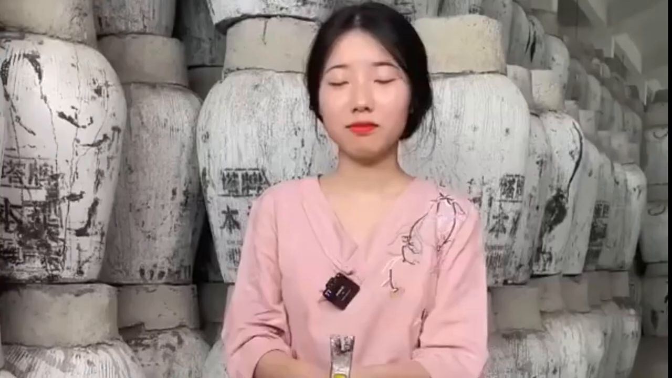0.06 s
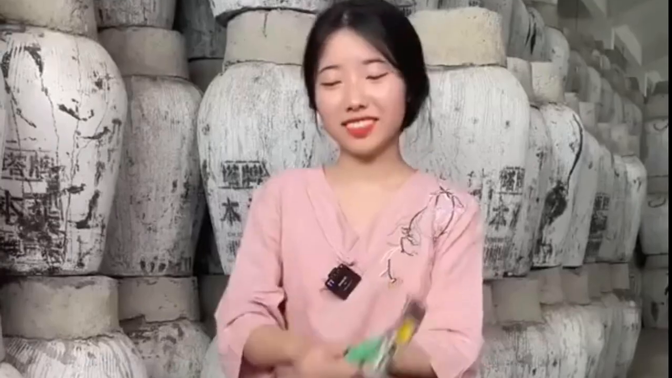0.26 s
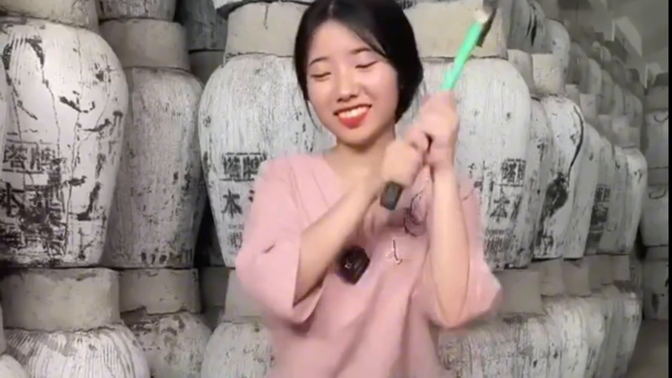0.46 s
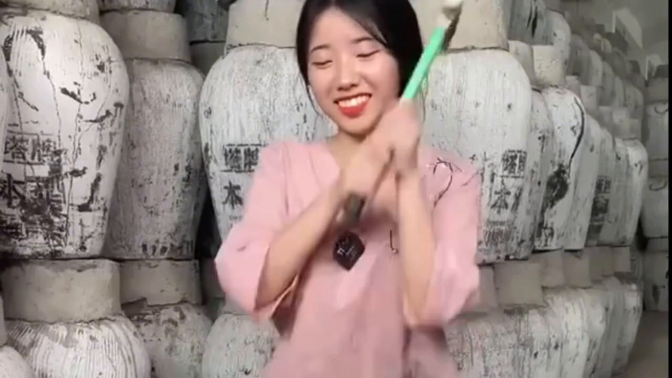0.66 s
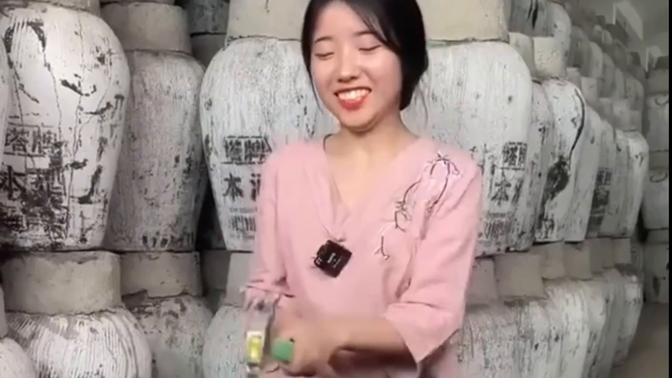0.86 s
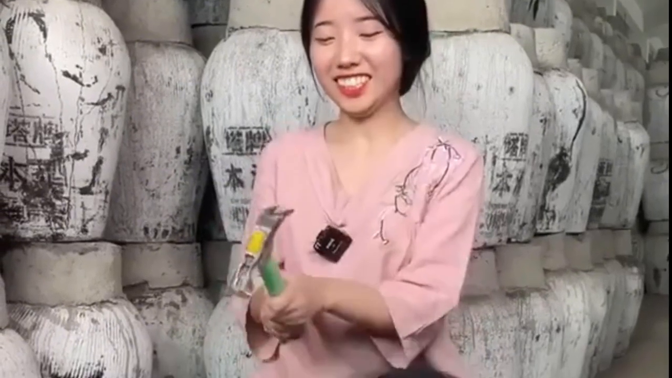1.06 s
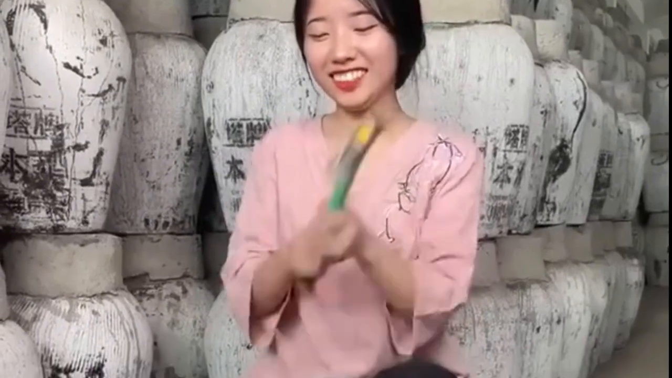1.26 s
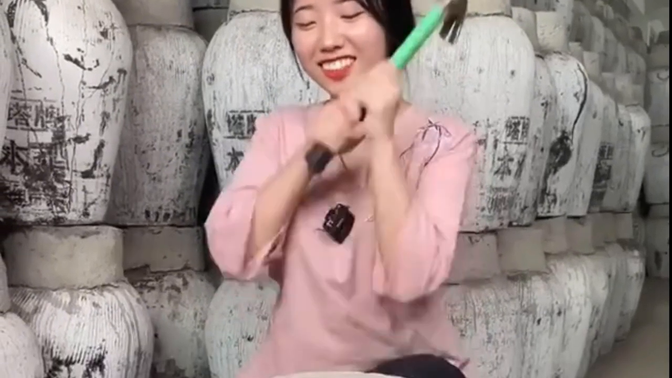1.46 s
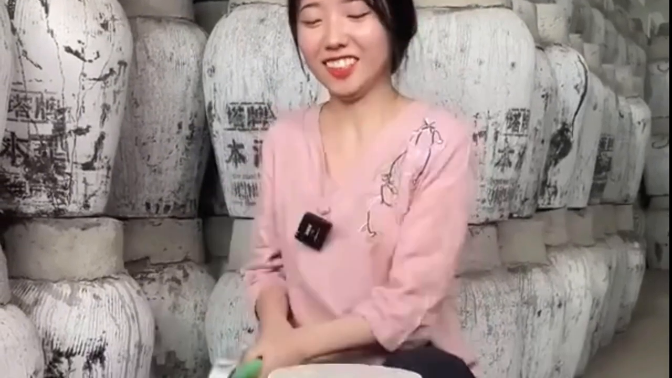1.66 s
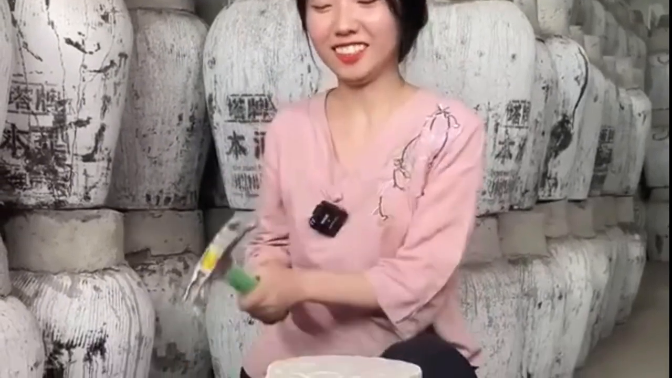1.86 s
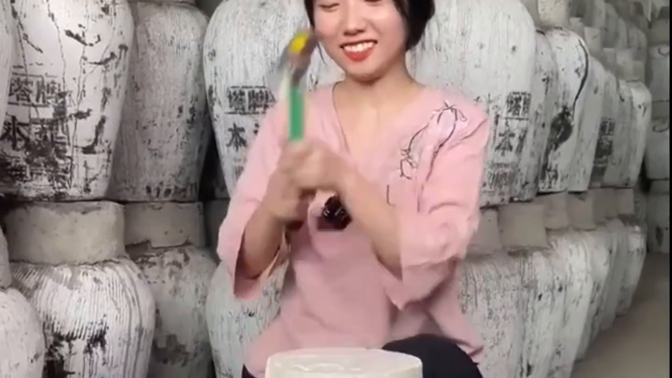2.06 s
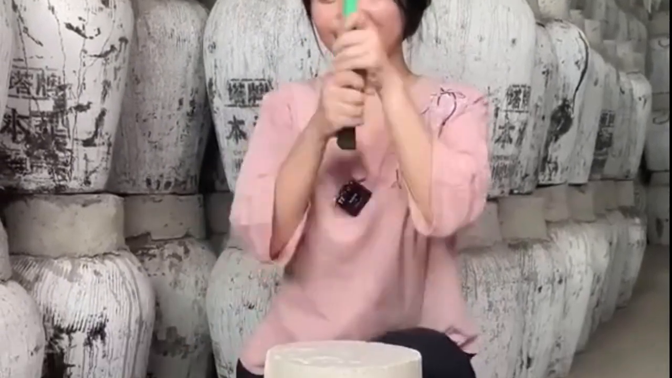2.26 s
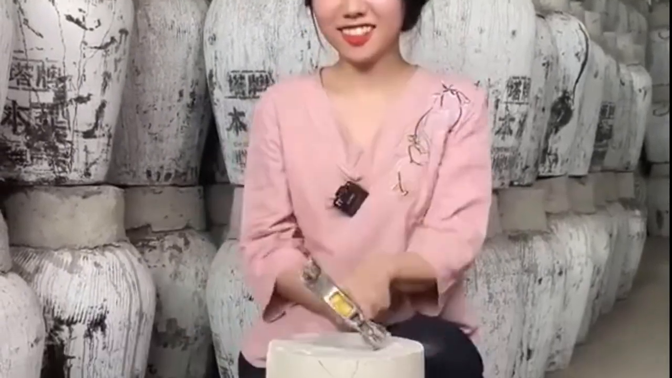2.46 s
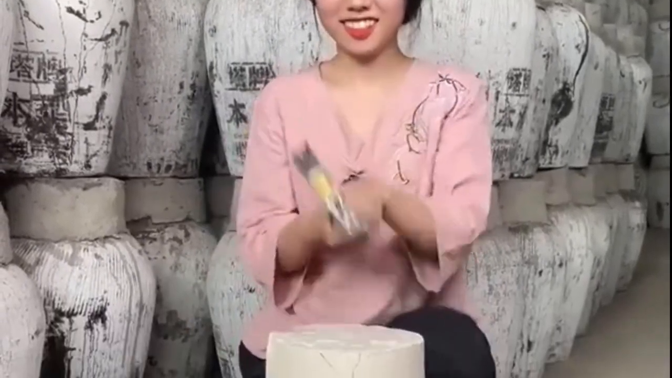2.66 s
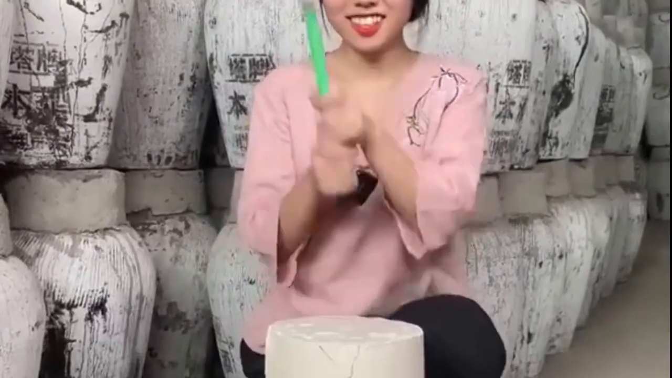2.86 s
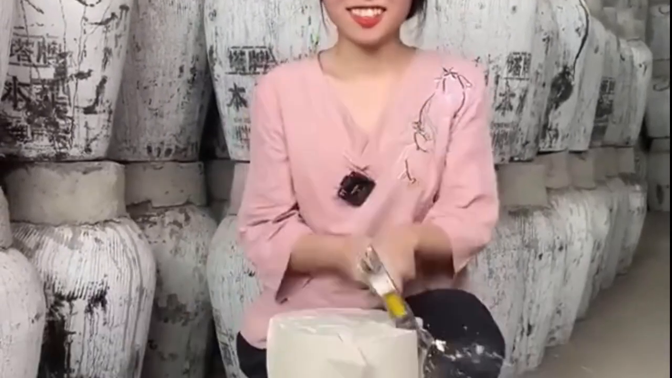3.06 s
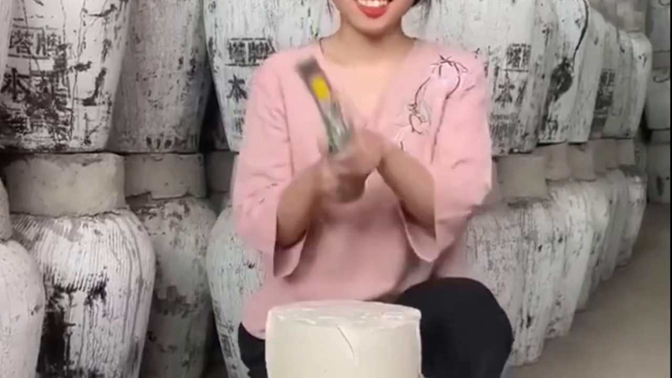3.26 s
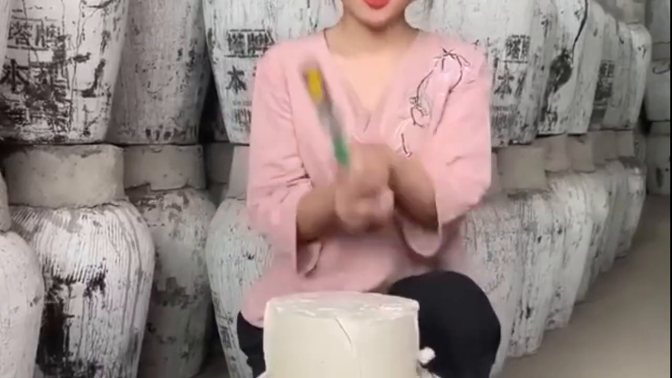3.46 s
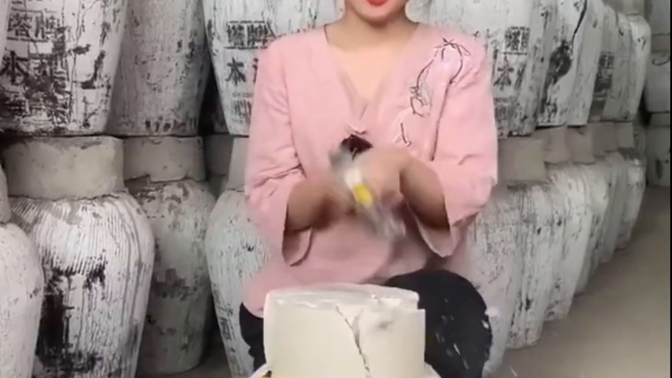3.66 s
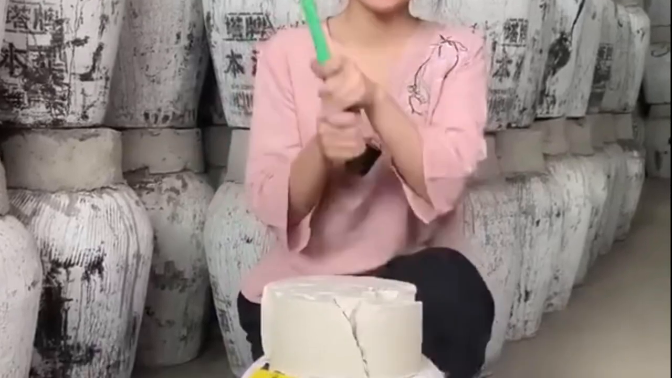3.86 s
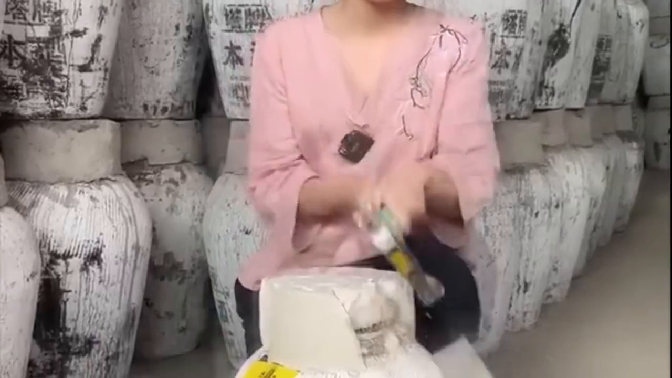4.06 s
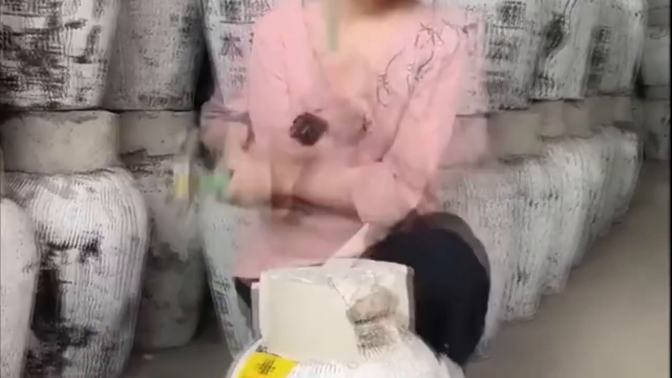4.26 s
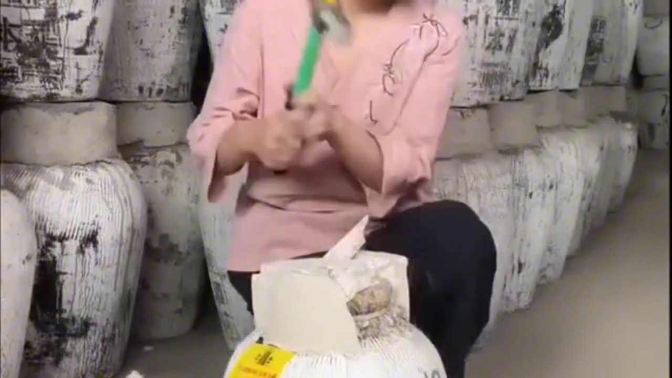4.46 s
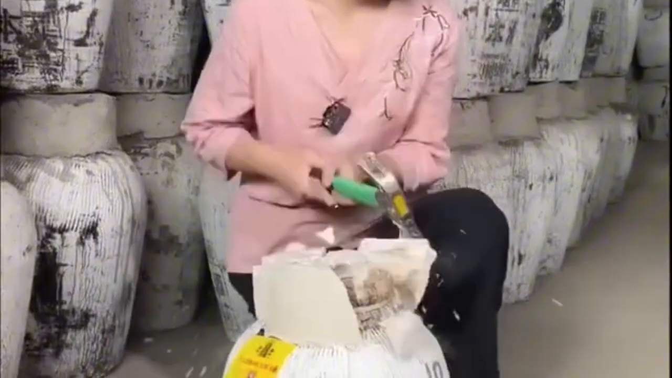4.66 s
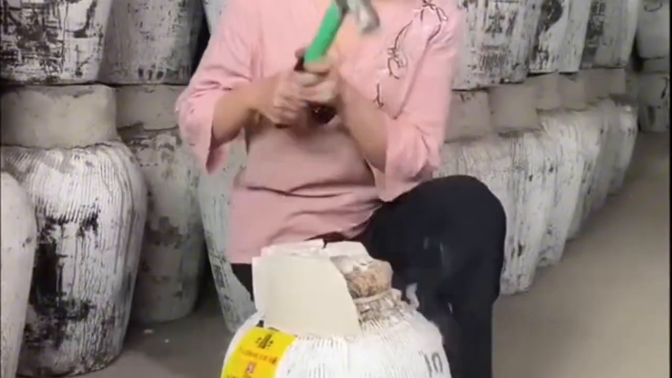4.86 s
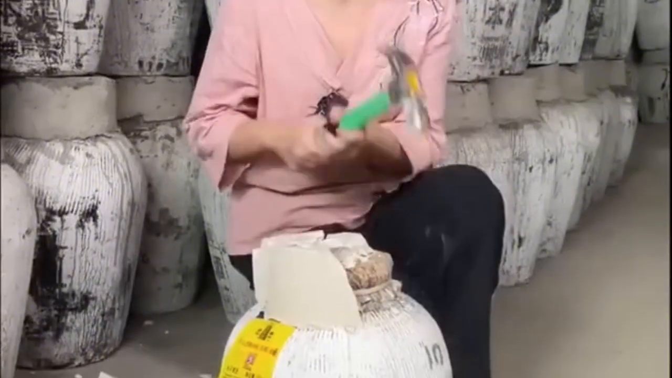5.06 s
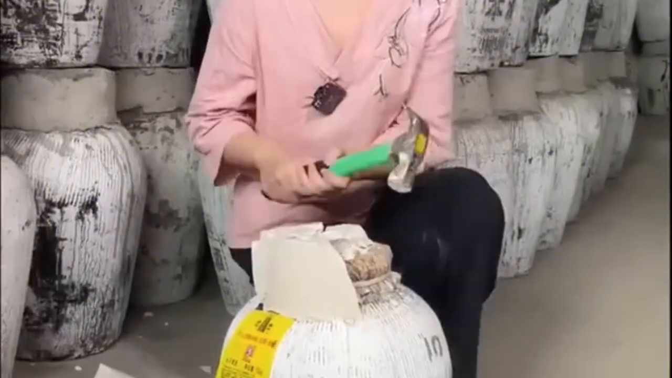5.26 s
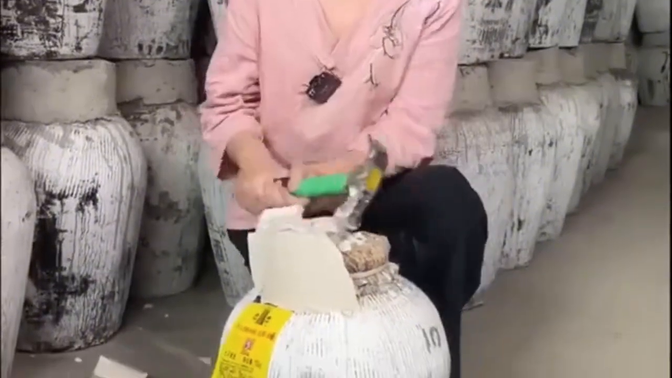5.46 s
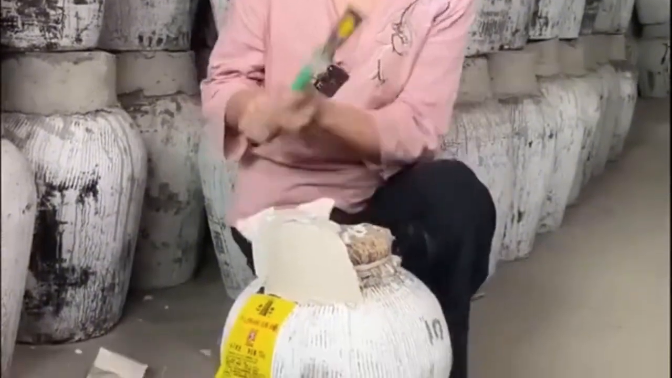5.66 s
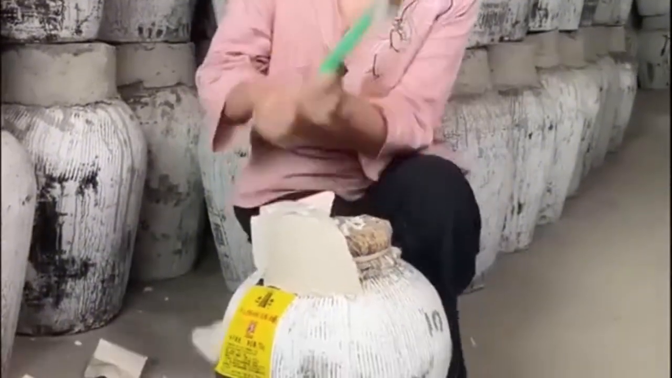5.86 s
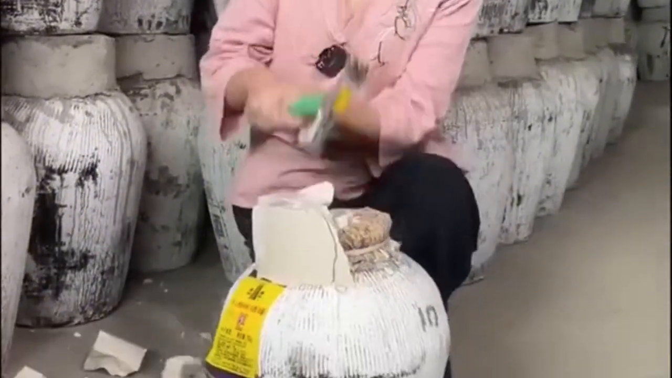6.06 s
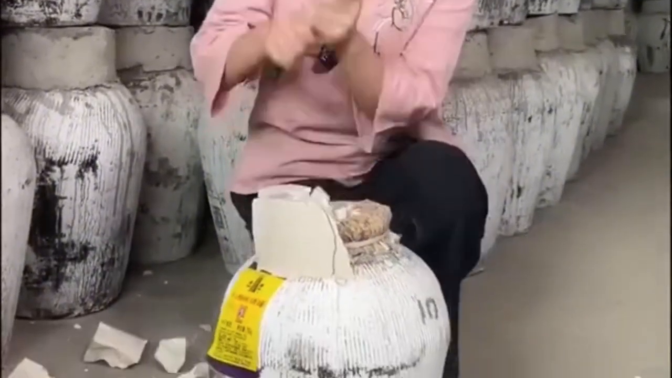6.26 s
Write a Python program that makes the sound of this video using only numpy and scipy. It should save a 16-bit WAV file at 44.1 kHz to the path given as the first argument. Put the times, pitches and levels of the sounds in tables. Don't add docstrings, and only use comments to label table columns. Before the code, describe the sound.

Sharp, slightly distorted hammer knocks, roughly every half to one second, split a clay seal. The jar answers with a short hollow ring around mid pitch and the stacked jars prolong it in a reverberant tail. Early blows are cleaner; from the middle onward, broken pieces tumble, thump, tick and scatter grit on the hard floor. Close phone microphone, quiet background hum.

```python
import sys
import numpy as np
from scipy import signal
from scipy.io import wavfile
from scipy.ndimage import uniform_filter1d

SR = 44100
rng = np.random.default_rng(int(sys.argv[2]) if len(sys.argv) > 2 else 0)


def waveform_to_disk(signal):
    frames = np.transpose(np.atleast_2d(signal))
    scaled = np.clip(frames, -1, 1) * 32767
    samples = np.round(scaled).astype(np.int16)
    wavfile.write(sys.argv[1], SR, samples)


def makeup_ratio(level_db):
    decades = np.asarray(level_db, float) / 20
    return 10 ** decades


N = 278712
TIME = np.arange(N) / SR
BAND_EDGES_HZ = 28 * 2 ** np.arange(0, 9.1, 1 / 3)

# start_s, force_db, bass_db, treble_db, crack_t60_s
HAMMER_BLOWS = [
    (0.737, 12.5, -5.5, -1.5, 0.22),
    (1.551, 6, -3.5, -2.5, 0.23),
    (2.413, 3, 4, -3.5, 0.2),
    (2.9175, 0.5, 4, -2, 0.16),
    (3.4781, -2.5, 5.5, -8.5, 0.16),
    (3.939, 5, 2, -6, 0.12),
    (4.5288, 1.5, 4, -5.5, 0.23),
    (5.413, -22.5, -1.5, -1, 0.099),
    (5.903, -4, 8, 1, 0.12),
]
# air_db, wall_db, shoulder_over_wall_db, neck_over_wall_db
BLOW_DRIVES = [
    (-9.5, 8, -14, -6.5),
    (-10.5, 7, -6.5, -6),
    (-11, -1, 4, -2),
    (-5, -1.5, -2.5, -3),
    (-13, -6.5, -9, 0),
    (-4, -6.5, 2, 3.5),
    (-8, -0.5, -7.5, 0.5),
    (-24, -28, -12, -1),
    (-8, -8, -5.5, -4.5),
]
MODE_PITCHES = [
    [102, 350, 417],
    [1088, 1113],
    [1242, 1280, 1543, 1565],
    [1694, 1718],
    [2125, 2180, 2245, 2325, 2410],
    [2575, 2980, 3085, 3268, 3455, 3890, 4600],
]
# level_db, t60_s
MODE_DECAYS = [
    [(-24.5, 0.13), (-8.5, 0.21), (-8, 0.068)],
    [(-5, 0.38), (-7, 0.11)],
    [(-8, 0.16), (-13, 0.29), (-6, 0.13), (-25, 0.89)],
    [(-1.5, 0.18), (-14.5, 0.41)],
    [(-1, 0.076), (-7, 0.37), (-9, 0.11), (-1.5, 0.11), (-2.5, 0.13)],
    [(0, 0.11), (-11.5, 0.043), (-4, 0.086), (-7, 0.044), (-8.5, 0.05), (-17.5, 0.041), (-12, 0.088)],
]
# pitch_hz, level_db [dB per Hz]
CRACK_SPECTRUM = [(24, -52.5), (40, -41), (363, 5.5), (1360, -8), (1700, -6), (1920, -3.5), (2170, 1),
                  (4320, -6.5), (12100, -22.5), (14000, -31)]
# pitch_hz, level_db [dB per Hz]
TAIL_SPECTRUM = [(24, -58), (40, -28), (97, -2.5), (401, -2.5), (992, -3.5), (1090, -9), (1180, -10.5),
                 (2520, -9), (5520, -14.5), (11800, -26.5), (13000, -44.5), (14000, -105)]
# pitch_hz, t60_s
STOREROOM_T60 = [(100, 1.8), (260, 1.63), (700, 1.45), (1840, 1.058), (4850, 0.86), (12800, 0.2)]
# start_s, peak_db, dull_db, sharp_db
SHARD_TICKS = [(1.727, 1, -18, -16), (1.7545, -8, -6, -12), (1.765, -11, -8, -12), (1.7794, -13, -10, -15),
               (3.176, -16, -1, -35), (3.303, -19.5, -5, -21), (3.316, -16.5, -10, -18),
               (3.697, -22, -10, -18), (3.886, -27, -13, -3.5), (4.0727, -12, 8, -29),
               (4.1291, 2, -2.5, -28), (4.2844, -22.5, -5, -27), (4.3457, -8.5, 0, -15),
               (4.8394, -21, -2, -18), (4.8448, -7.5, 9, -14), (4.8908, -14, -3, -10),
               (4.9325, -16, 6, -15), (5.5783, -23, -6, -14), (5.6209, -21, 0.5, -23),
               (5.7185, -35, 7, -16), (5.9865, -16, -8, -28), (6.129, -27, -14, -22),
               (6.1493, -22.5, -10, -27), (6.2675, -24, 0, -15.5)]
# start_s, peak_db, brightness_db
CHIP_TICKS = [(2.7234, -41, -4), (3.2054, -31, 22), (3.258, -33, 4), (3.359, -26.5, -6), (3.602, -33, -10),
              (3.638, -27, -10), (3.727, -32, -8), (3.738, -28, -4), (3.7852, -36, 0), (3.8144, -37, 5),
              (3.846, -40, 7), (4.2075, -33, -5), (4.3984, -43, 24), (4.4477, -27, 3), (4.9871, -35, 5),
              (5.1374, -41, 24), (5.5503, -34, 0), (5.6457, -28, 1), (5.677, -30.5, 0), (5.758, -34, 3),
              (5.814, -32, 8), (5.8655, -37, 21), (6.2123, -29.5, -10)]
# start_s, pitch_hz, level_db, t60_s
SHARD_RINGS = [(1.728, 4990, -7, 0.1), (1.726, 8220, -19, 0.07), (1.729, 5070, -11, .1),
               (1.729, 4910, -14, .08), (1.726, 2930, -14.5, 0.067), (1.754, 12150, -45, 0.14),
               (1.754, 2320, -13, 0.052), (3.177, 6450, -35, 0.1), (3.176, 8300, -34, 0.14),
               (3.313, 9000, -25, 0.14), (3.354, 8900, -35, 0.12), (4.18, 6560, -33.5, .07),
               (4.237, 10700, -50, 0.17), (4.272, 5000, -30.5, 0.052), (4.334, 9600, -35.5, 0.045),
               (4.4, 11600, -34, 0.048), (4.4, 8760, -40, 0.051), (5.4134, 1010, -14, 0.05),
               (4.846, 8550, -30.5, 0.071), (4.933, 12100, -33.5, 0.038), (4.932, 9700, -29, 0.041),
               (4.988, 5660, -38, 0.087), (4.988, 9560, -41, 0.07), (5.028, 4870, -42, 0.12),
               (5.138, 11700, -42, 0.048), (4.932, 1100, -15, .04), (4.932, 780, -14, .04),
               (4.0725, 720, -14, .04), (5.904, 2580, -12, .09), (5.72, 1750, -38, .07)]
# start_s, peak_db, pitch_hz
LUMP_THUDS = [(1.496, -14, 190), (1.522, -16, 187), (2.962, 11.5, 406), (3.116, 0, 340), (3.162, -7, 287),
              (3.213, -1, 204), (3.529, 2.5, 404), (4.068, 10, 420), (4.181, -27, 251), (4.208, -12, 214),
              (4.929, 11, 515), (5.411, 4.5, 454), (5.542, -13, 211), (5.622, -22, 220), (5.645, -4.5, 197),
              (5.734, -11, 228), (5.758, -26, 194), (5.81, -28, 180), (5.95, 4, 395), (5.986, 15, 422),
              (6.034, 1, 407), (6.063, -5.5, 369)]
# start_s, level_db, rise_s, t60_s
RUBBLE_ROLLS = [
    (2.95, -7.5, 0.022, 1.36),
    (3.1, -10.5, 0.087, 0.69),
    (3.5, -8.5, 0.0082, 0.46),
    (3.97, -2, 0.0064, 0.34),
    (4.1, -15, .01, 1.7),
    (4.599, -9, 0.0086, 0.53),
    (4.925, -4.5, .005, 0.28),
    (5.52, -8, 0.1, 1.2),
    (5.73, -17, 0.012, 0.87),
    (5.95, -5.5, .01, 0.68),
]
# start_s, level_db, t60_s
GRIT_FALLS = [
    (0.78, -26, .8),
    (2.45, -40, .8),
    (2.96, -35, 4.4),
    (3.52, -53, 8.0),
    (3.98, -35, 1.9),
    (4.6, -23, 0.39),
    (5.44, -20.5, 0.44),
    (5.66, -34.5, 0.76),
    (5.96, -27, 0.8),
]
# start_s, level_db
GRIT_SPILLS = [(1.77, -11), (1.904, -30), (3.321, -33), (3.897, -48), (4.075, -25), (4.205, -29),
               (4.287, -27), (4.402, -32), (4.615, -20), (4.707, -22), (4.993, -33), (5.145, -51),
               (5.632, -36), (6.142, -31.5)]
# pitch_hz, level_db [dB per Hz]
TONE_SPECTRUM = [(15, -50), (25, -17), (96, 10), (155, -14.5), (237, 1), (335, -4), (761, -10), (2940, -26),
                 (3530, -21), (3830, -16.5), (6160, -17.5), (11300, -38), (12900, -42), (14000, -68)]


def rms_one(x):
    return x / np.sqrt(np.mean(x ** 2) + 1e-20)


def at_hz(points, hz):
    table_hz, values = np.transpose(points)
    return np.interp(np.log(hz), np.log(table_hz), values)


def band(x, low_hz, high_hz):
    return signal.sosfilt(signal.butter(2, [low_hz, high_hz], "band", fs=SR, output="sos"), x)


def clicks(times, sizes):
    out = np.full(N, 1e-18)
    np.add.at(out, (np.asarray(times) * SR).astype(int), sizes)
    return out


def dying(x, t60):
    return signal.lfilter([1], [1, -makeup_ratio(-120 / (t60 * SR))], x)


def ring(x, hz, t60):
    radius, angle = makeup_ratio(-60 / (t60 * SR)), 2 * np.pi * hz / SR
    return signal.lfilter([0, np.sin(angle)], [1, -2 * radius * np.cos(angle), radius ** 2], x)


def add(out, s, sound):
    i = int(s * SR)
    out[i:i + len(sound)] += sound[:N - i]


def drift(rate):
    knots = rng.standard_normal(800)
    return np.interp(TIME * np.clip(rate, .1, 120), np.arange(800), knots)


def slide(s, db, rise, t60):
    t = np.maximum(TIME - s, 0)
    return makeup_ratio(db - 60 * t / max(t60, .05)) * (1 - np.exp(-t / max(rise, .001)))


def blows_in_room():
    crack_over_room_db, crack_loss = 14.5, 0.63
    s, force_db, bass_db, treble_db, crack_t60 = np.transpose(HAMMER_BLOWS)
    white, out = rng.standard_normal((2, N)), np.zeros(N)
    crumble = drift(68) + drift(25)
    cracks = np.array([dying(clicks([t], 0.9), max(d, .01)) for t, d in zip(s, crack_t60)])
    for k, (low, high) in enumerate(zip(BAND_EDGES_HZ, BAND_EDGES_HZ[1:])):
        hz = np.sqrt(low * high)
        tilt = np.log2(hz / 1200) / 2.78
        treble = np.clip(tilt, 0, 1)
        level_db = force_db + bass_db * np.clip(-tilt, 0, 1) + treble_db * treble
        fed = clicks(s, makeup_ratio(2 * level_db))
        build_up_s = 0.011 + 2.4 / hz
        tail = np.abs(dying(fed, at_hz(STOREROOM_T60, hz)) - dying(fed, build_up_s))
        uneven = makeup_ratio(2 * (0.5 * drift(13) + 0.89 * treble * crumble))
        power = makeup_ratio(2 * (at_hz(TAIL_SPECTRUM, hz) - 44.5)) * tail * uneven
        crack = makeup_ratio(2 * (level_db + crack_over_room_db - crack_loss * force_db)) @ cracks
        power += makeup_ratio(2 * (at_hz(CRACK_SPECTRUM, hz) - 46.5)) * crack
        out += np.sqrt(power * (high - low)) * rms_one(band(white[k % 2], low, high))
    return out


def jars():
    s, out = np.array(HAMMER_BLOWS)[:, 0], np.zeros(N)
    air, wall, shoulder, neck = np.transpose(BLOW_DRIVES)
    seal = wall - 2.5 - 0.45 * s
    drives = [air, wall, seal, wall + shoulder, wall + neck, wall + neck + 1.5]
    for pitches, modes, drive_db in zip(MODE_PITCHES, MODE_DECAYS, drives):
        for hz, (level_db, t60) in zip(pitches, modes):
            size = makeup_ratio(drive_db + level_db + rng.normal(0, 0.38, len(s)))
            struck = clicks(s, size * rng.choice([-1, 1], len(s)))
            swell = ring(struck, hz, t60 * 0.15)
            out += ring(struck, hz, t60) * makeup_ratio(2.75 * drift(hz / 30)) - swell
            waver = 1300 / hz + .7 * drift(hz / 40)
            out += makeup_ratio(-16.5) * ring(struck, hz, .95 * at_hz(STOREROOM_T60, hz)) * waver
    return out


def stack():
    s, force_db = np.transpose(HAMMER_BLOWS)[:2]
    out = np.zeros(N)
    for hz in np.geomspace(1200, 5000, 36) * rng.uniform(0.95, 1.03, 36):
        chance_db = rng.normal(0, 4.85, len(s))
        struck = clicks(s, makeup_ratio(force_db - 30 - 3.6 * np.log2(hz / 1000) + chance_db))
        out += ring(struck, hz, .8 * at_hz(STOREROOM_T60, hz)) * drift(80)
    return out


def shard_ticks():
    out, t, white = np.zeros(N), TIME[:4096], rng.standard_normal(N)
    dull = rms_one(band(white, 900, 2500))
    mid = rms_one(band(white, 2300, 6300))
    sharp = rms_one(band(white, 6300, 12500))
    chips = [(s, db, -4, -20 + bright_db) for s, db, bright_db in CHIP_TICKS]
    for s, peak_db, dull_db, sharp_db in SHARD_TICKS + chips:
        t60 = max(0.026 * makeup_ratio(.05 * (peak_db + 31)), .004)
        at = slice(int(s * SR), int(s * SR) + len(t))
        mix = mid[at] + makeup_ratio(dull_db) * dull[at] + makeup_ratio(sharp_db) * sharp[at]
        age = t[:len(mix)]
        snap = 1 + 1.65 * np.exp(-age / 0.00057)
        add(out, s, makeup_ratio(peak_db - 6.0 - 60 * age / t60) * snap * mix)
    return out


def shard_rings():
    out, t = np.zeros(N), TIME[:SR // 2]
    rocking = makeup_ratio(4 * drift(110))
    for s, hz, level_db, t60 in SHARD_RINGS:
        split = rng.uniform(0.00086, 0.007)
        pair = np.sin(2 * np.pi * hz * t) + 0.54 * np.sin(2 * np.pi * hz * (1 + split) * t)
        pair = pair * np.roll(rocking, -int(s * SR))[:len(t)]
        add(out, s, makeup_ratio(level_db - 60 * t / t60) * np.minimum(t / 0.0002, 1) * pair)
    return out


def lumps():
    out, t = np.zeros(N), TIME[:4096]
    for s, peak_db, hz in LUMP_THUDS:
        t60 = 5.04 / hz
        onset = np.minimum(t * hz * 2.5, 1)
        add(out, s + 0.00385, makeup_ratio(peak_db - 1.0 - 60 * t / t60) * np.sin(2 * np.pi * hz * t) * onset)
    return out


def grains(per_s, sizes, pitches, cycles):
    knocks = (rng.random(N) < per_s / SR) * sizes * rng.choice([-1, 1], N)
    dealt = rng.integers(0, len(pitches), N)
    return sum(ring(knocks * (dealt == k) + 1e-18, hz, cycles / hz) for k, hz in enumerate(pitches))


def rubble():
    sizes = makeup_ratio(1.5 * np.minimum(rng.exponential(1, N), 2))
    roll = grains(160, sizes, np.geomspace(170, 620, 6), 5.9)
    level = sum(slide(*row) for row in RUBBLE_ROLLS) * makeup_ratio(0.83 * drift(30))
    return makeup_ratio(-12.0) * level * rms_one(band(roll, 118, 520))


def grit():
    fizz = grains(7000, makeup_ratio(2.5 * rng.exponential(1, N)), np.geomspace(1800, 12000, 8), 10.0)
    level = sum(slide(s, db, 0.031, t60) for s, db, t60 in GRIT_FALLS)
    level = level + sum(makeup_ratio(db) * np.exp(-((TIME - s) / .013) ** 2) for s, db in GRIT_SPILLS)
    return makeup_ratio(-7.0 + 4.0 * drift(40)) * level * rms_one(fizz)


def echoes(x):
    t, white = TIME[:SR * 3 // 2], rng.standard_normal(SR * 3 // 2)
    reply = np.zeros(len(t))
    for low, high in zip(BAND_EDGES_HZ[3::2], BAND_EDGES_HZ[5::2]):
        reply += makeup_ratio(-60 * t / at_hz(STOREROOM_T60, low)) * band(white, low, high)
    reply *= np.minimum(t / 0.0067, 1)
    return signal.fftconvolve(x, reply / np.sqrt(np.sum(reply ** 2)))[:N]


def room_tone():
    white, out = rng.standard_normal((2, N)), np.zeros(N)
    widths = np.diff(BAND_EDGES_HZ)
    centres = np.sqrt(BAND_EDGES_HZ[:-1] * BAND_EDGES_HZ[1:])
    power = makeup_ratio(2 * at_hz(TONE_SPECTRUM, centres)) * widths
    levels = makeup_ratio(-41) * np.sqrt(power / np.sum(power))
    for k, level in enumerate(levels):
        out += level * rms_one(band(white[k % 2], BAND_EDGES_HZ[k], BAND_EDGES_HZ[k + 1]))
    return out


def scene():
    pieces = shard_ticks() + shard_rings() + grit()
    low = lumps() + rubble()
    blows = blows_in_room() + jars() + stack()
    mono = blows + pieces + low + echoes(makeup_ratio(-15.0) * (pieces + low)) + room_tone()
    return np.array([mono, mono])


def low_pass(x):
    return signal.sosfilt(signal.butter(12, 14220, fs=SR, output="sos"), x)


def record(dry):
    top = .67
    mono = dry[0] / (1 + np.abs(dry[0] / top) ** 8) ** (1 / 8)
    mono = signal.sosfilt(signal.cheby1(10, 1, 13100, fs=SR, output="sos"), mono)
    white, side, frame = rng.standard_normal(N), np.zeros(N), np.arange(N) // 2048
    attacks = clicks(np.array(HAMMER_BLOWS)[1:, 0], 1)
    quiet = np.convolve(attacks, np.ones(3500))[300:N + 300] < .5
    edges = np.geomspace(4200, 12800, 10)
    for low, high in zip(edges, edges[1:]):
        level = np.sqrt(np.abs(uniform_filter1d(band(mono, low, high) ** 2, 1024)))
        chosen = (rng.random(frame[-1] + 1) < .72)[frame]
        patch = uniform_filter1d(chosen * quiet * 1., 400)
        side += makeup_ratio(-4.5) * level * patch * rms_one(band(white, low, high))
    side = signal.sosfilt(signal.butter(10, 3900, "high", fs=SR, output="sos"), side)
    return low_pass(np.array([mono + side, mono - side]))


dry = scene()
out = record(dry)
waveform_to_disk(out)
```